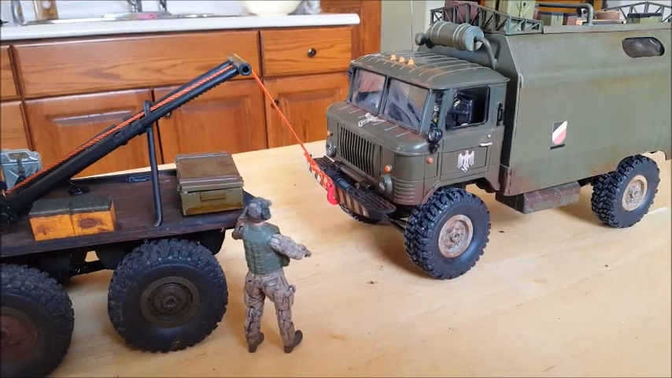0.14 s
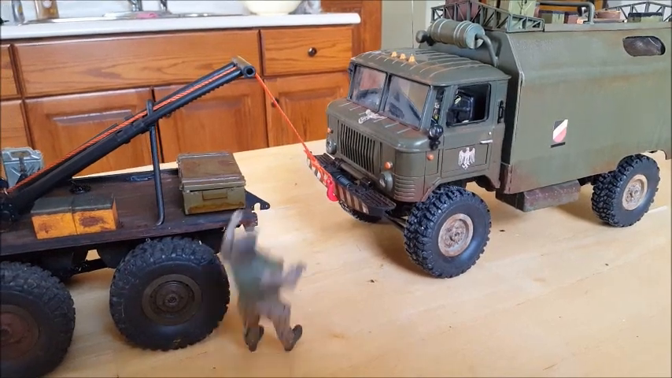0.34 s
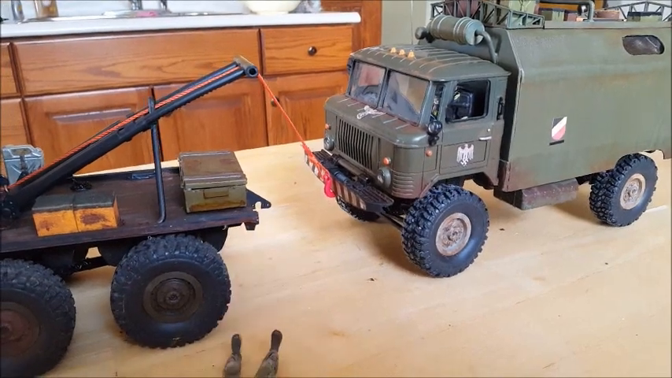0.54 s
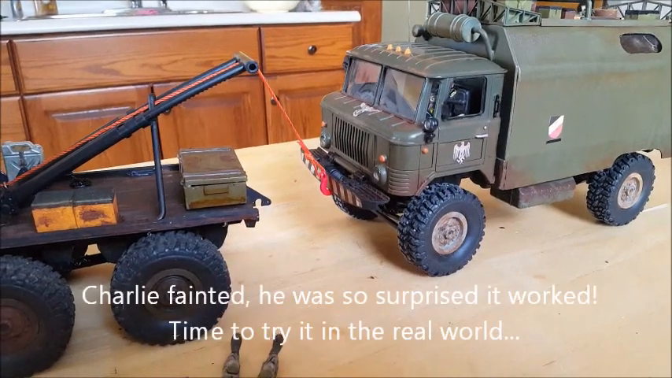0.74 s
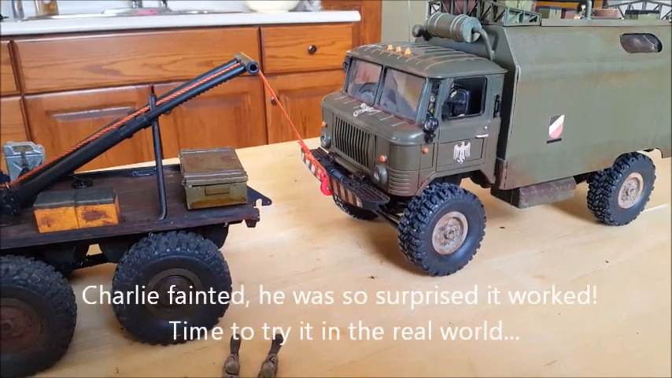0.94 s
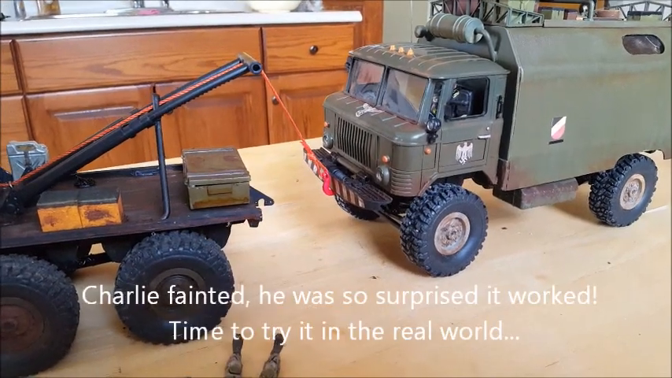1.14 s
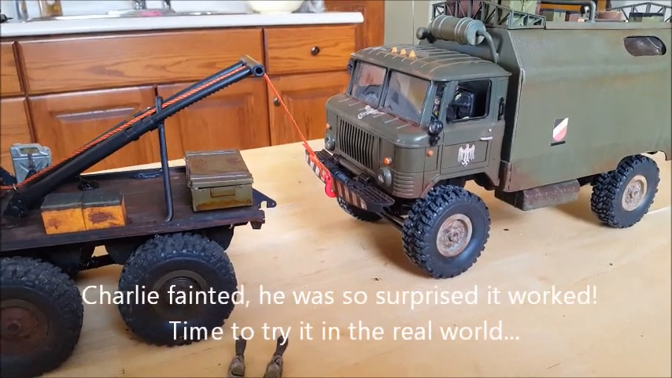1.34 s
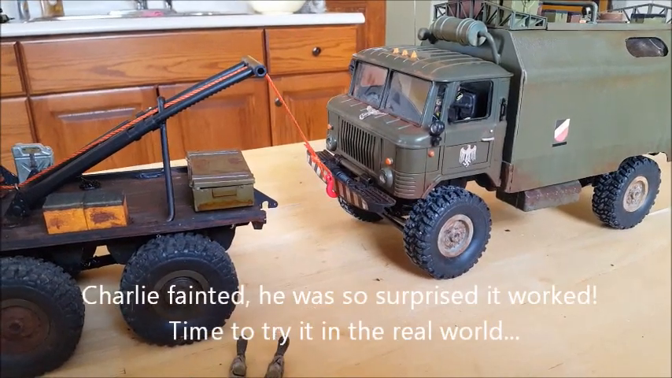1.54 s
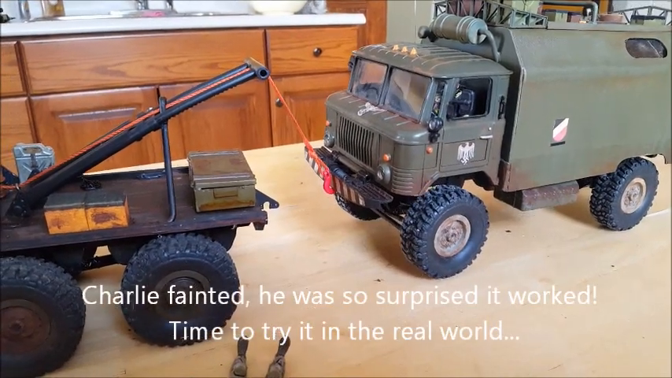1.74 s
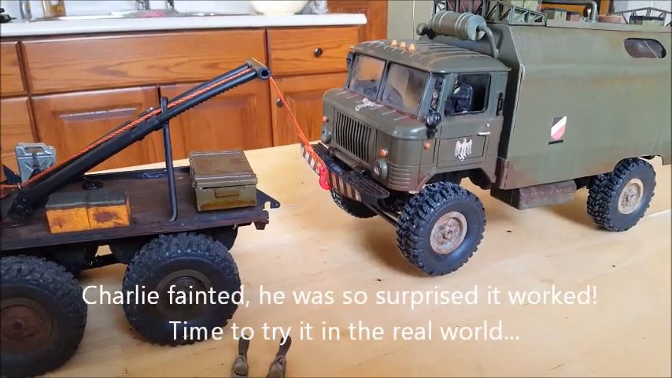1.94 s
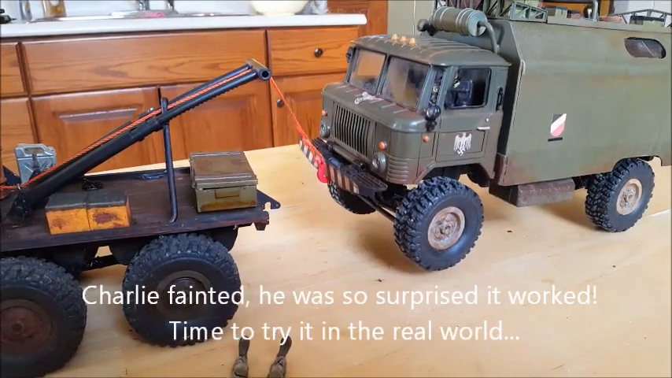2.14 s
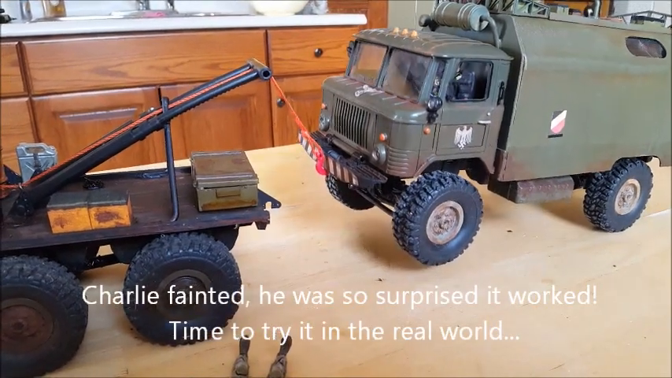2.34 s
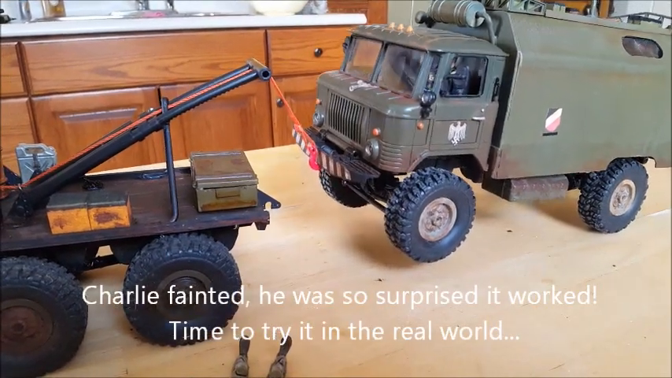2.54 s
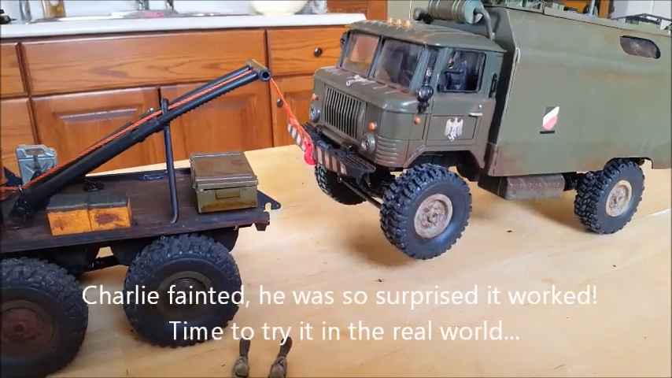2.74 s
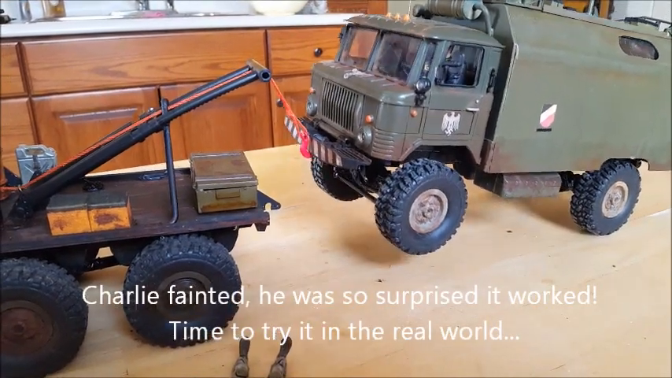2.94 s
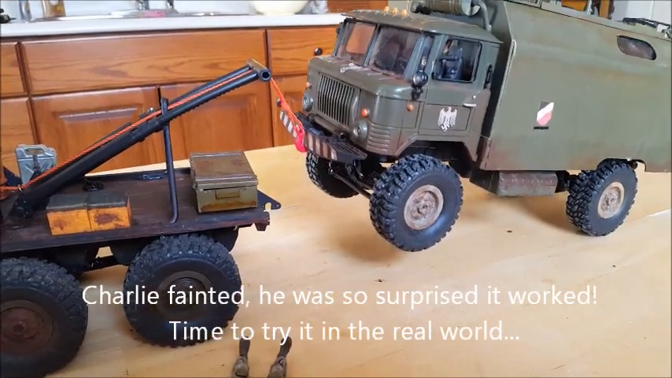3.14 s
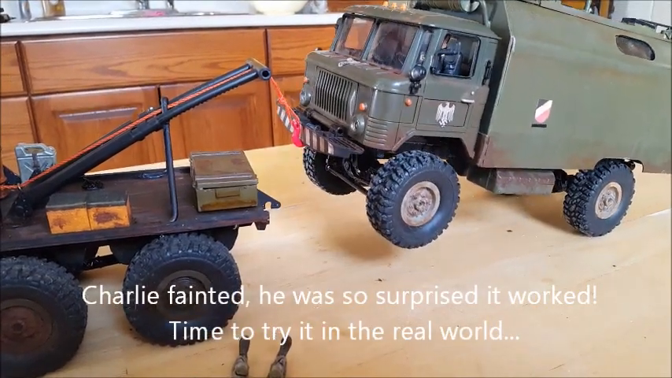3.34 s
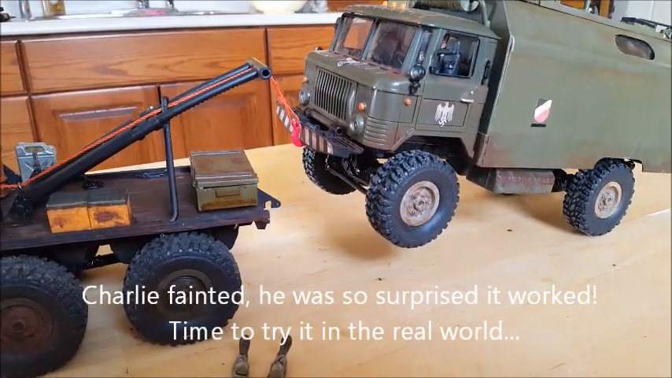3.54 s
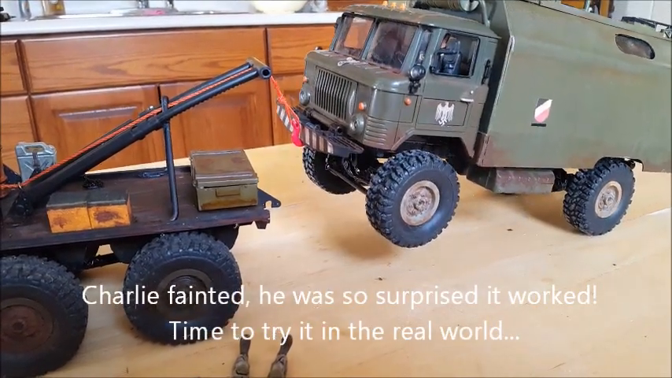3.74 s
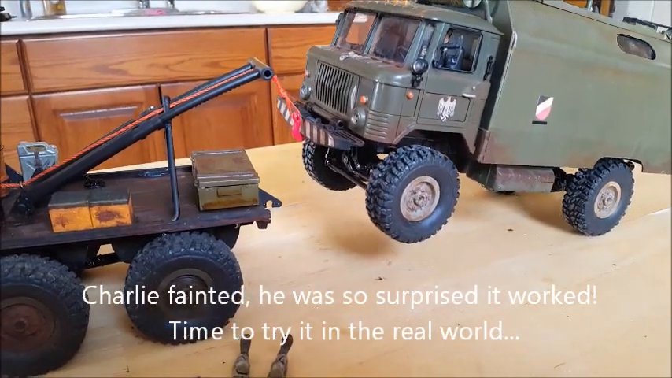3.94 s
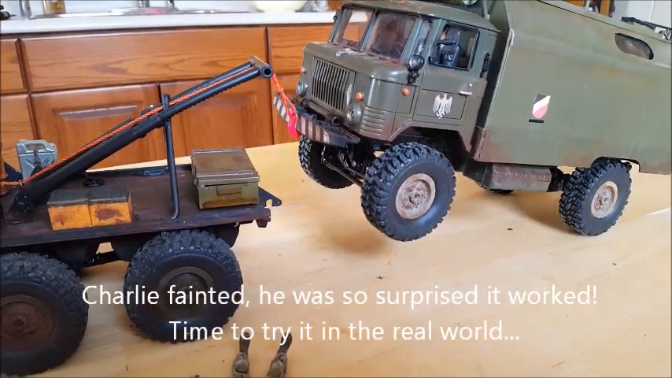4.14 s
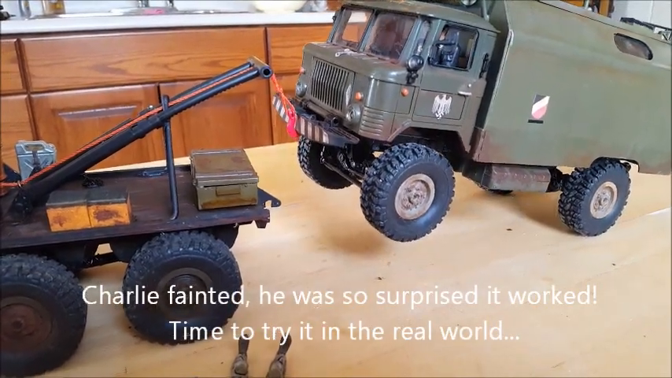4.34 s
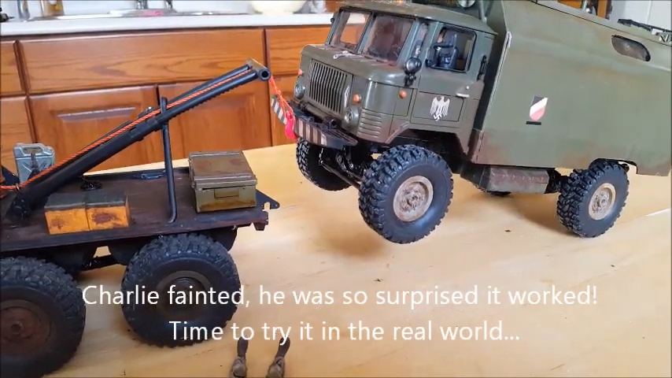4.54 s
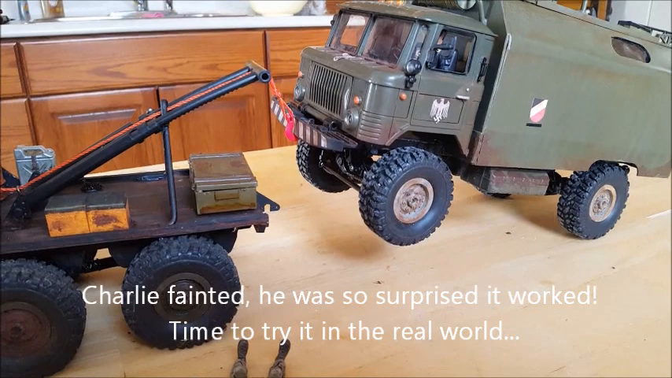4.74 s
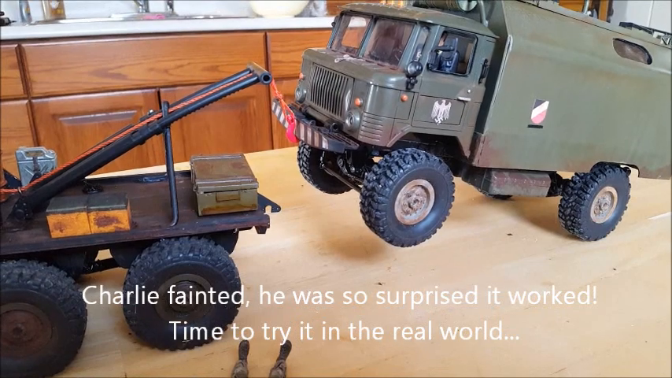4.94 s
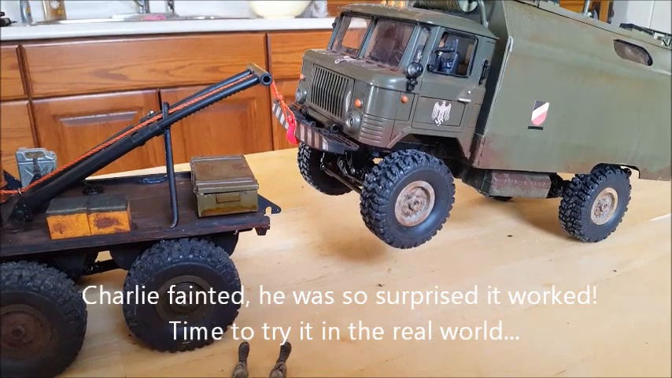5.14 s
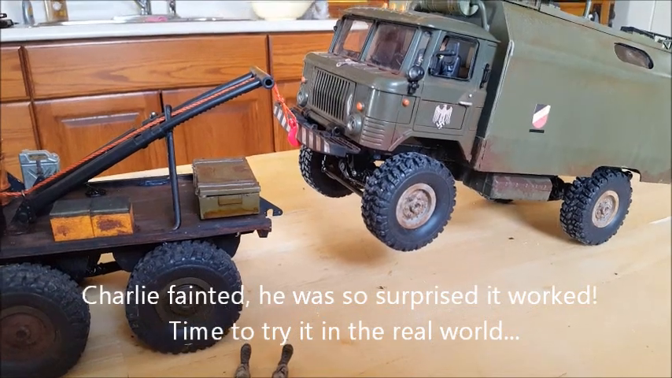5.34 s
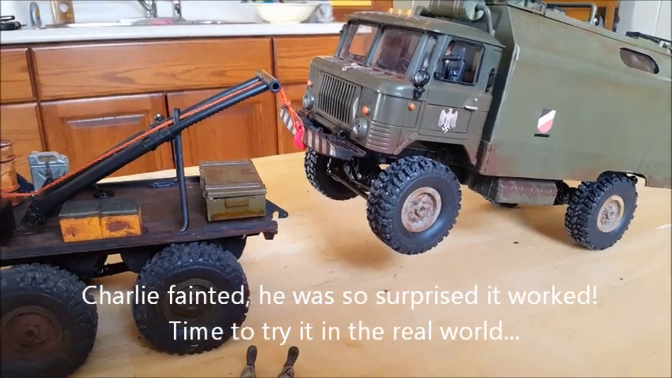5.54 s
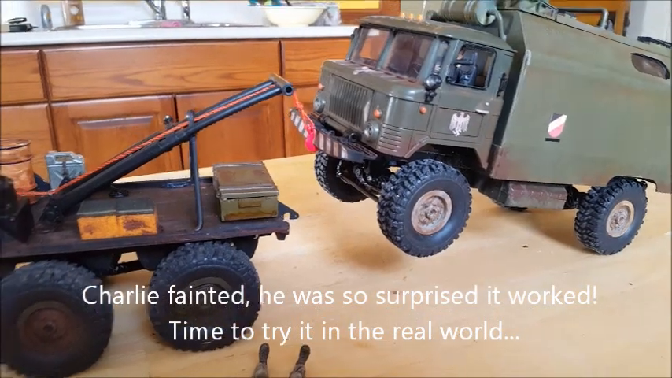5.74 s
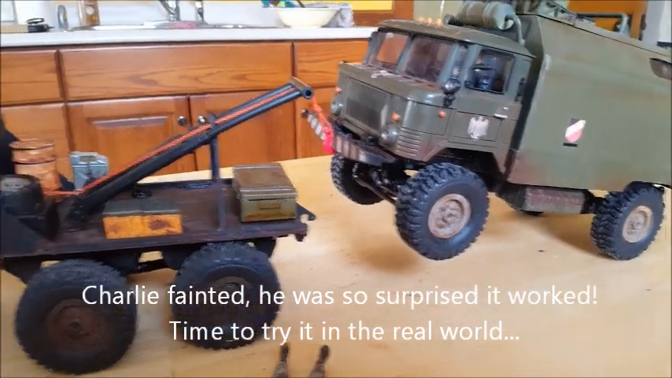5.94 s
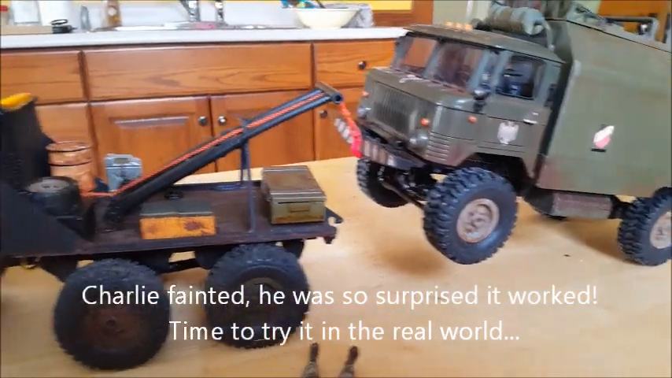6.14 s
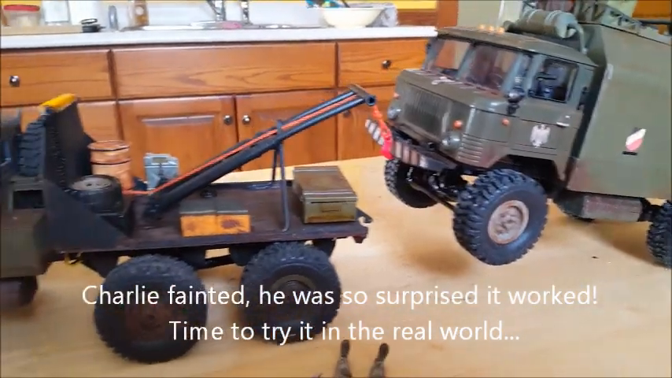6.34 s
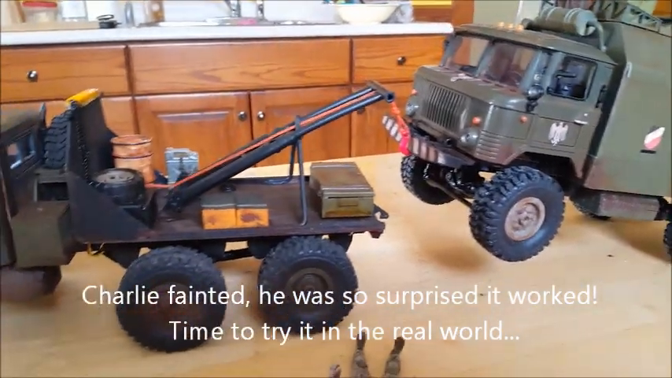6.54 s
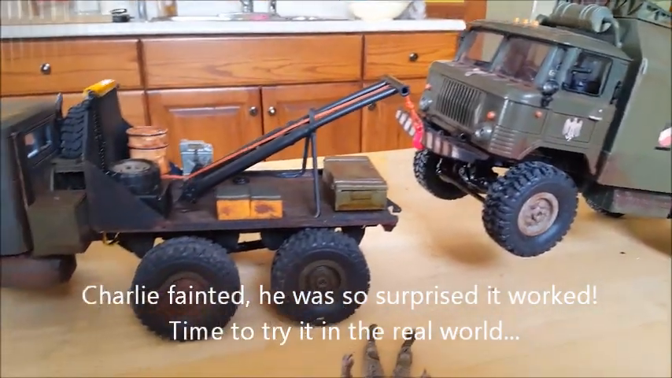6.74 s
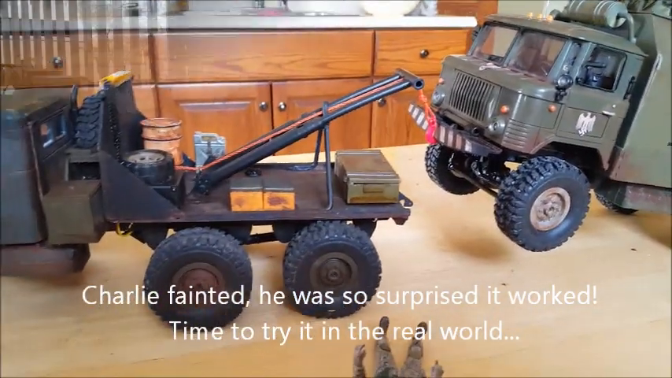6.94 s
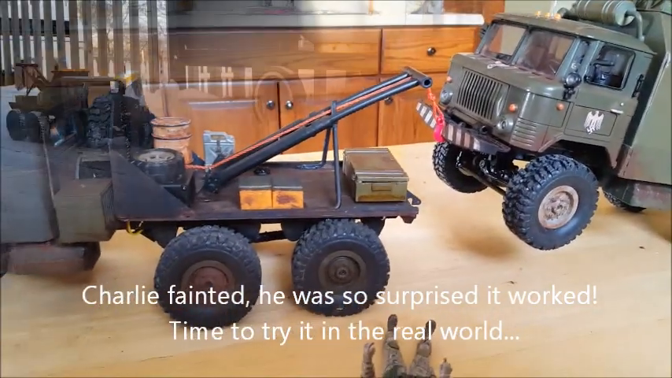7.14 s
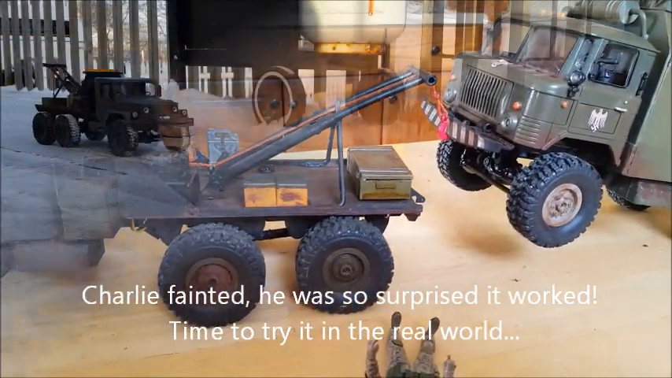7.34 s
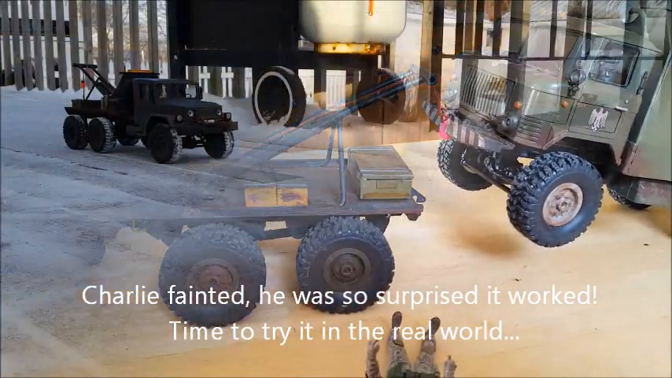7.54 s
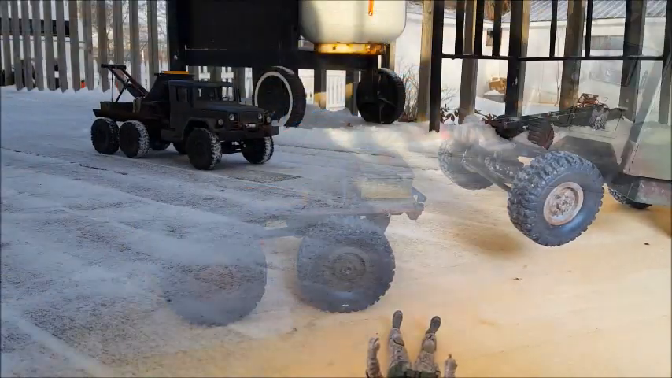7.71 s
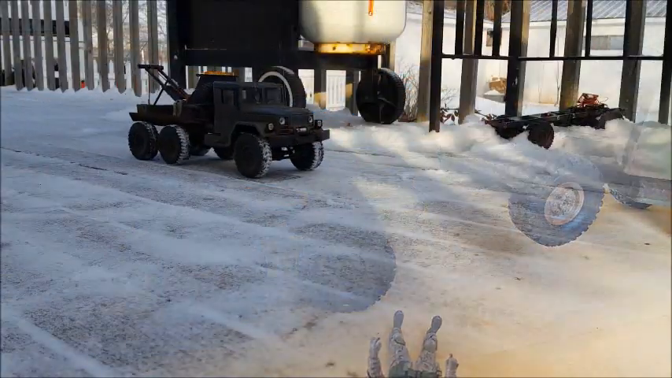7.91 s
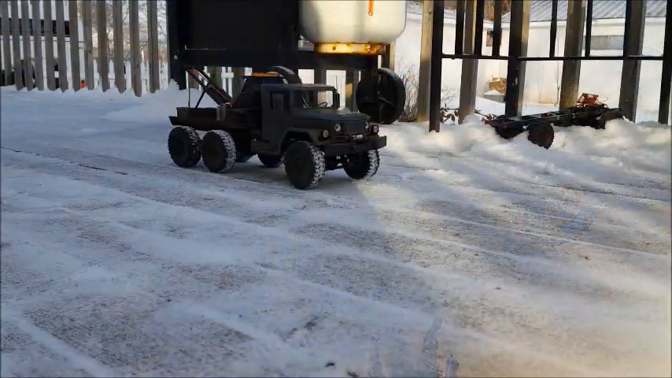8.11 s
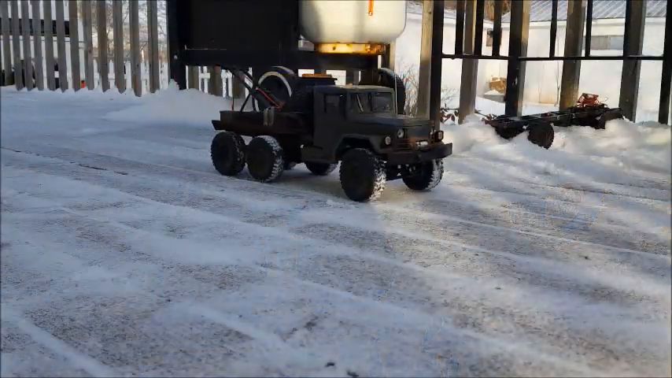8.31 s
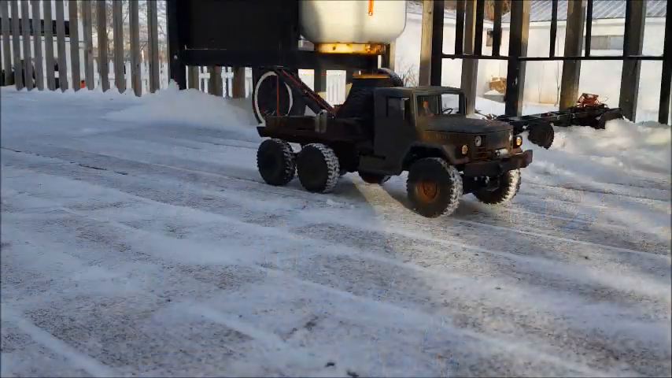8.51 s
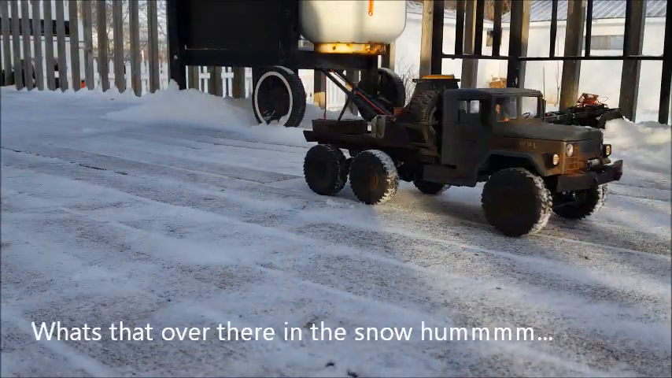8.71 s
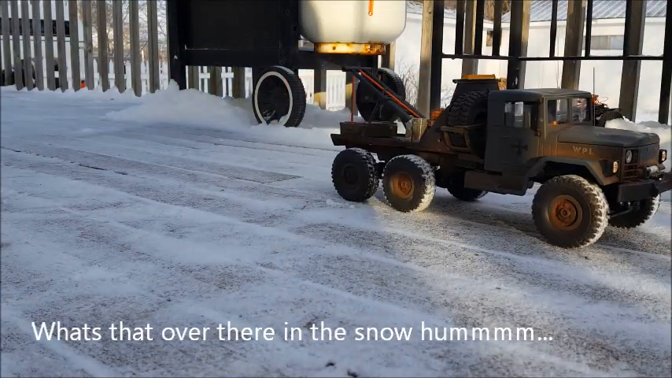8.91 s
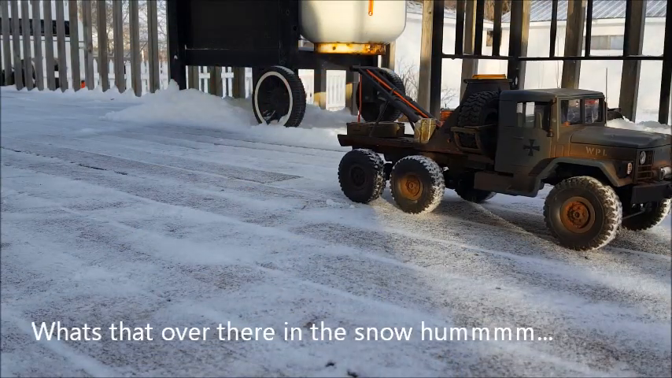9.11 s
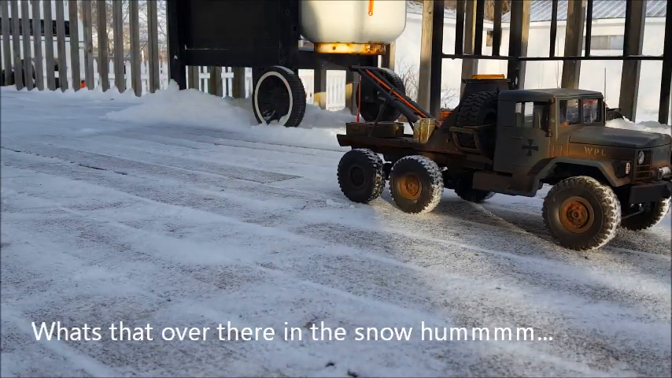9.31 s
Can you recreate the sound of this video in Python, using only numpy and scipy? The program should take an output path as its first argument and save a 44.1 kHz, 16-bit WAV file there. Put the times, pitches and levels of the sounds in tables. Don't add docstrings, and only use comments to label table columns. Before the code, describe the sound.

Shrill toy winch whine, a sharp hollow knock on wood, more winch pulls over quiet hum, then an abrupt cut to outdoor rushing, motor whirr and snow crunch.

```python
import sys
import numpy as np
from scipy import signal
from scipy.fft import rfft, irfft, next_fast_len
from scipy.io import wavfile

SR = 44100
rng = np.random.default_rng(int(sys.argv[2]) if len(sys.argv) > 2 else 0)


def volts_from_db(level):
    exponent = np.asarray(level, float) / 20
    return 10 ** exponent


def int16_out(signal):
    q = np.round(np.clip(np.atleast_2d(signal).T, -1, 1) * 32767)
    wavfile.write(sys.argv[1], SR, q.astype(np.int16))


N = 413216
T = np.arange(N) / SR
SIZE = next_fast_len(N + SR)
HZ = np.maximum(np.arange(SIZE // 2 + 1) * SR / SIZE, 1)
SCENE_CHANGE_S = 6.666
LEFT_LAG_SAMPLES = -14

# start in seconds, stop in seconds, gear hiss over the mean in dB, brush level in dB,
# line taut from in seconds.
BURSTS = [
    (0.054, 0.698, 6, 0.5, .4),
    (1.653, 3.423, 5.5, -1, 0.0054),
    (3.887, 4.183, 5, -5, 0.014),
]
# time in seconds, tooth rate in Hz.
TOOTH_RATES = [
    [(.12, 1907), (.18, 1950), (.33, 1884), (.4, 1814), (.48, 1782), (.56, 1752), (.62, 1684), (.7, 1639)],
    [(1.82, 1594), (1.89, 1631), (2.12, 1626), (2.3, 1577), (2.55, 1624), (2.68, 1593), (2.82, 1632),
     (2.94, 1543), (3.3, 1516)],
    [(3.95, 1464), (4.0, 1515), (4.045, 1535), (4.12, 1492), (4.19, 1435)],
]
# start in seconds, duration in seconds, gain in Hz.
LOAD_EASES = (3.3, 0.095, 70)
# multiple of tooth rate, level in dB, loss on a slack line in dB.
MESH = [(1, -1, -0.5), (2, -1.04, 0.5), (3, -4.5, 26), (4, 1.5, 7), (5, 0.4, 10), (6, -6, 9), (7, -13, 8)]
# centre in Hz, width in Hz, left level in dB, right level in dB, right lead in rad.
CASE = [(1600, 250, -52, -45, .05), (1810, 250, -50, -42, .05), (3200, 450, -39, -36, 1.4),
        (3720, 480, -31.5, -30.5, -.8), (4540, 260, -35.5, -41, -2), (4870, 260, -20, -25, -.4),
        (5350, 450, -27, -31, -.5), (6050, 380, -37, -39, .05), (6400, 220, -43, -58, -1.3),
        (7500, 600, -51, -53, 2.5), (8200, 330, -42, -38, 3), (8700, 500, -41, -35.5, 1.2),
        (9800, 400, -35.5, -34.5, .4), (10850, 400, -58, -47, .6)]
# multiple of shaft turn, level in dB.
SHAFT = [(3, -64), (5, -71), (6, -68), (7, -67), (9, -61.5)]
# frequency in Hz, density in dB per Hz.
LOOSE_HISS = [(500, -18.5), (1400, -25.5), (2400, -22.5), (3150, -4.5), (3600, -6.5), (4200, -6.5),
              (6200, -10), (7300, -9), (8200, -2), (9300, -13), (10700, -15), (12900, -9.5), (14500, -14.5),
              (16000, -20)]
LOADED_HISS = [(500, -18), (2500, -17), (3100, -4), (3600, -24), (3850, -8), (4100, -44), (4350, -28),
               (4800, 1), (5700, -10), (6300, -5), (7250, -24), (8100, -6), (8900, -15), (9700, -8),
               (10500, -22), (12700, -1), (14500, -15), (15800, -14)]
# frequency in Hz, left-right difference in dB.
HISS_PAN = [(500, -1.5), (3000, -3.5), (5000, 3.5), (6500, 9), (8000, 1), (11000, -6.5), (13000, 9.5),
            (15500, 21.5)]
# frequency in Hz, likeness of the sides 0-1.
HISS_ALIKE = [(500, 0.43), (3000, 0.31), (8000, 0.2), (15000, 0.33)]
# frequency in Hz, density in dB per Hz.
IDLE_BUZZ = [(10500, -41.0), (11800, -0.5), (12800, -2), (14200, -5.0), (15000, -41)]
# time in seconds, peak in dB, ring in Hz, left-right difference in dB.
CLICKS = [
    (.0356, -17, 2110, 4.5),
    (1.6025, -22.5, 2050, 8),
    (4.1657, -20.5, 2680, 6),
    (5.1682, -57.5, 2200, 2),
    (6.4694, -47.5, 2400, -.6),
    (8.653, -28, 1520, -8),
    (8.79, -40, 2600, 0),
    (8.8745, -30, 1710, -16),
    (9.11, -37, 2600, -6),
]
# time in seconds, peak in dB, ring in Hz, left-right difference in dB.
TAPS = [(0.8294, -48, 1840, -18), (0.9063, -38, 1850, -5.5), (1.0193, -51.5, 1864, -5.5),
        (3.8207, -60, 1370, -1), (4.0184, -44, 2080, -4.5), (4.346, -60, 2530, -4),
        (4.407, -44.5, 1070, -0.5), (4.7863, -58, 982, -2.5)]
# time in seconds, peak in dB, crack in dB.
FALL = [
    (0.585, -1, -24),
    (0.612, -6.5, -24),
    (0.64, -6.5, -17.5),
    (0.669, -22.5, -16),
    (0.699, -24.5, -22),
]
# frequency in Hz, level in dB, t60 in seconds.
BOARDS = [(152.8, -17.5, 0.52), (217, -16.5, 0.78), (266, -15.5, 0.32), (450, -5.5, 0.5),
          (515, -14.5, 0.25), (624, -17, 0.48), (740, -9, 0.18), (870, -2.5, 0.64), (1076, -5, 0.25),
          (1150, -9, 0.42), (1264, -6, 0.51), (1290, -18.5, 0.388), (1567, -25, 0.49), (1590, -17, 0.3),
          (1786, -11.5, 0.52), (1720, -20.5, 0.48)]
# frequency in Hz, density in dB per Hz.
THUMP = [(29, -42), (50, -14.5), (203, -3), (304, -18), (446, -10), (539, -12.5), (1020, -4.5), (4140, -23),
         (5010, -19), (7350, -55.5), (8000, -37), (10400, -63.5), (17600, -120)]
# time in seconds, level in dB.
THROTTLE = [(6.68, -46.5), (7.4, -48), (7.55, -45), (8.04, -44), (8.62, -40), (8.73, -42), (8.86, -42.5),
            (9.02, -52), (9.12, -50.5)]
# time in seconds, turn rate in Hz.
TRUCK_TURNS = [(6.67, 381), (7.1, 381), (7.4, 378), (8.65, 380), (8.85, 349), (9.15, 330)]
# multiple of turn rate, level in dB.
TRUCK_ORDERS = [(2, -12), (4, -3), (5, -7), (7, -13), (14.3, -14)]
# frequency in Hz, width in Hz, level in dB.
TRUCK_RINGS = [(448, 74, -4), (734, 20, -11), (1207, 140, 0), (2600, 130, -2.5), (5360, 200, -40)]
# frequency in Hz, density in dB per Hz.
WHIRR = [(530, -13), (900, -14.5), (1390, -4), (1510, -2), (1640, -4), (1890, -2), (2590, -6.5),
         (3400, -14.5), (4420, -43), (7480, -120)]
CRUNCH = [(1760, -54), (3000, -10.5), (4230, 1.5), (4900, -1.5), (5440, 2.5), (7050, -5), (8700, -5.5),
          (10500, -13.5), (15000, -11.5), (16000, -31)]
# frequency in Hz, left-right difference in dB.
CRUNCH_PAN = [(4000, 0.5), (8000, -3.5), (13000, 9.5)]
# frequency in Hz, likeness of the sides 0-1.
YARD_ALIKE = [(60, 0.24), (180, 0.7), (550, 0.52), (1650, 0.041), (4970, 0.025), (15000, 0.02)]
# frequency in Hz, t60 in seconds.
ROOM_T60 = [(60, .6), (300, .52), (2000, .46), (5000, .33), (12000, .2)]
# frequency in Hz, side share 0-1.
ROOM_WIDTH = [(100, .25), (300, .4), (900, 0.92)]
# frequency in Hz, density in dB per Hz.
KITCHEN = [(12, -37), (20, -16), (43, -22), (81, -5.5), (138, -6.5), (187, -6.5), (319, -13.5),
           (377, -11.5), (527, -17), (1370, -21.5), (1480, -23), (2670, -26.5), (4810, -37.5), (13000, -46),
           (16000, -42)]
# frequency in Hz, likeness of the sides.
KITCHEN_ALIKE = [(60, 1), (180, 0.88), (550, 0.94), (1650, 0.037), (4970, -0.14), (15000, -0.06)]
# time # in seconds, level in dB.
KITCHEN_LEVEL = [(0.0, -53.5), (0.57, -51.5), (0.72, -41), (0.94, -56), (1.21, -56), (1.8, -54),
                 (3.25, -50.5), (3.71, -53.5), (4.04, -53), (6.6, -55.5)]
KITCHEN_FADE = [(6.7, 6), (7.6, 7), (8.6, 4), (9.37, -40)]
# multiple of stroke rate, level in dB.
HUM = [(1, -61), (2, -60.5), (3, -74), (4, -71)]
# frequency in Hz, level in dB.
HUM_LINES = [(145.3, -78), (242.2, -72), (1362, -72.5), (2724, -82)]
# frequency in Hz, density in dB per Hz.
TRAFFIC = [(12, -44), (20, -24), (70, -2), (107, -3.5), (146, -5), (198, -12), (270, -13), (542, -7),
           (738, -5), (1060, -11), (16000, -53.5)]
# frequency in Hz, width in Hz, level in dB.
FAR_FAN = (742, 25, -13)

TEETH = 10
SPIN_UP_S, SPIN_START_SHARE, WHINE_RISE_S = 0.032, 0.64, 0.064
ATTACK_S, RELEASE_S, TAUTEN_S, GEAR_DB = 0.023, 0.04, 0.04, -45.5
LABOUR_HZ, LABOUR_DB_PER_HZ, KNOCK_FREE_DB, KNOCK_RANGE_DB = 1569, 0.6, -13, 14.5
IDLE_DB, IDLE_OFF_S, IDLE_REST_DB = -78.5, 4.85, -86.5
CONTACT_HZ = 2467
HALT_S, HALT_FADE_S, HALT_DB, HALT_CRUNCH_DB = 9.13, 0.098, -8.5, -4
CRUNCH_DB, CRUNCH_FOLLOWS, WHINE_EXTRA = -47.5, 0.61, 0.66
CRUST_S, CRUST_DB_PER_S2 = 7.84, -2.5
HUM_HZ, TRAFFIC_DB = 93.3, -46
TOP_HZ, OFFSET = 15700, -0.0007


def rms_one(x):
    return x / np.sqrt(np.mean(x ** 2) + 1e-20)


def in_time(rows):
    s, *columns = np.transpose(rows)
    return [np.interp(T, s, c) for c in columns]


def at_hz(points, hz):
    table_hz, value = np.transpose(points)
    return np.interp(np.log(hz), np.log(table_hz), value)


def drift(rate_hz):
    r = np.exp(-40 * np.pi * rate_hz / SR)
    slow = signal.lfilter([1], [1, -2 * r, r * r], rng.standard_normal(N // 20 + 4002))[4000:]
    return np.interp(np.arange(N) / 20, np.arange(len(slow)), rms_one(slow))


def bandpass(x, low_hz, high_hz, order=1):
    return signal.sosfilt(signal.butter(order, [low_hz, high_hz], "band", fs=SR, output="sos"), x)


def pair(x, pan_db, lag=LEFT_LAG_SAMPLES):
    return np.array([np.roll(x, round(lag)) * volts_from_db(pan_db / 2), x * volts_from_db(-pan_db / 2)])


def ring(x, hz, t60_s):
    r, w = volts_from_db(-60 / (t60_s * SR)), 2 * np.pi * hz / SR
    return signal.lfilter([0, np.sin(w)], [1, -2 * r * np.cos(w), r * r], x + 1e-18)


def noise(spectrum, alike, patchy_db=0, lag=0, pan=((1, 0), (2, 0)), grain_db=0):
    grain = volts_from_db(grain_db * np.minimum(rng.exponential(1, SIZE), 4))
    both, left, right = rfft(rng.standard_normal((3, SIZE)) * grain) * volts_from_db(at_hz(spectrum, HZ))
    c, side = np.clip(at_hz(alike, HZ), 0, 1), volts_from_db(at_hz(pan, HZ) / 2)
    late = np.exp(-2j * np.pi * HZ * lag / SR)
    left = (np.sqrt(c) * both * late + np.sqrt(1 - c) * left) * side
    right = (np.sqrt(c) * both + np.sqrt(1 - c) * right) / side
    lr = np.array([left, right])
    if not patchy_db:
        out = irfft(lr, SIZE)[:, :N]
    else:
        out = np.zeros((2, N))
        octave, shared = np.clip(np.log2(HZ / 200), 0, 6), drift(4.8)
        for k in range(7):
            band = irfft(lr * np.clip(1 - abs(octave - k), 0, 1), SIZE)[:, :N]
            out += band * volts_from_db(patchy_db * (0.13 * shared + drift(19.3)))
    return out / np.std(out.mean(axis=0))


def winch(burst, tooth_rate, hiss):
    start_s, stop_s, hiss_db, brush_db, taut_s = burst
    since_s = np.maximum(T - start_s, 0)
    ease_s, ease_over_s, ease_hz = LOAD_EASES
    eased_hz = ease_hz * np.clip((T - ease_s) / ease_over_s, 0, 1) * (start_s < ease_s)
    spin_up = 1 - (1 - SPIN_START_SHARE) * np.exp(-(since_s / SPIN_UP_S) ** 2)
    teeth_hz = (in_time(tooth_rate)[0] + eased_hz) * spin_up
    waver = 1 + 0.003 * drift(30.2) + 0.0032 * drift(120)
    phase = 2 * np.pi * np.cumsum(teeth_hz * waver) / SR
    turn = phase / TEETH

    out = hiss * volts_from_db(GEAR_DB + hiss_db) * (1 + 0.16 * np.cos(turn))
    bite = np.minimum(since_s / WHINE_RISE_S, 1)
    slack = np.clip((taut_s - T) / TAUTEN_S, 0, 1)
    for k, mesh_db, slack_db in MESH:
        throb = 1 + 0.36 * np.cos(turn + k) + 0.17 * np.cos(2 * turn + k)
        uneven = 1 + 0.17 * drift(100.0)
        left, right, lead = case_gain(k * teeth_hz[::16])
        gain = bite * volts_from_db(mesh_db - slack_db * slack + 2.4 * drift(34.0)) * throb * uneven
        left_whine = np.roll(gain * left * np.sin(k * phase), LEFT_LAG_SAMPLES)
        out = out + [left_whine, gain * right * np.sin(k * phase + lead)]
    out = out + pair(brushes(turn) * volts_from_db(GEAR_DB + brush_db + 1), 9, lag=-15)

    knock = sum(volts_from_db(db + 2.0 * drift(12)) * np.sin(k * turn + k) for k, db in SHAFT)
    labour_db = np.clip((LABOUR_HZ - teeth_hz) * LABOUR_DB_PER_HZ, 0, KNOCK_RANGE_DB)
    out = out + pair(knock * volts_from_db(KNOCK_FREE_DB + labour_db), -5.5, lag=-1.5)
    on = np.interp(T, [start_s, start_s + ATTACK_S, stop_s, stop_s + RELEASE_S], [0, 1, 1, 0]) ** 2
    return on * out


def case_gain(hz):
    power, cross = np.zeros((2, len(hz))), np.zeros(len(hz), complex)
    for top_hz, width_hz, left_db, right_db, lead in CASE:
        shape = (1 + (2 * (hz - top_hz) / width_hz) ** 2) ** -2
        power += volts_from_db([[left_db], [right_db]]) ** 2 * shape
        cross += volts_from_db(left_db + right_db) * shape * np.exp(1j * lead)
    left, right = np.sqrt(power)
    return np.repeat([left, right, np.angle(cross)], 16, axis=1)[:, :N]


def brushes(turn):
    angle = np.linspace(0, 2 * np.pi, 300)
    track = np.interp(turn % (2 * np.pi), angle, rng.standard_normal(300))
    return rms_one(bandpass(track, 11800, 13900, order=2))


def servo_idle():
    buzz = noise(IDLE_BUZZ, HISS_ALIKE, pan=HISS_PAN)
    return buzz * volts_from_db(np.where(T < IDLE_OFF_S, IDLE_DB, IDLE_REST_DB)) * (T < SCENE_CHANGE_S)


def clicks(rows, t60_s, lift_db, top_hz, ring_share):
    out, fade_s = np.zeros((2, N)), np.arange(1500) / SR
    decay = (np.exp(-fade_s / 0.0021) + 0.6 * np.exp(-fade_s / 0.012)) * np.minimum(fade_s / 0.00035, 1)
    for s, peak_db, hz, pan_db in rows:
        burst = rng.standard_normal(1500) * decay
        snap = rms_one(bandpass(burst, 600, top_hz))
        body = rms_one(ring(burst, hz, t60_s)) + 0.14 * rms_one(ring(burst, hz / 2, t60_s))
        tick = ring_share * body + (1 - ring_share) * snap
        placed, i = np.zeros(N), round(s * SR)
        placed[i:i + 1500] = tick / abs(tick).max() * volts_from_db(peak_db + lift_db)
        out += pair(placed, pan_db)
    return out


def fall():
    out, fade_s = np.zeros(N), np.arange(SR // 2) / SR
    size = len(fade_s)
    colour = volts_from_db(at_hz(THUMP, np.maximum(np.arange(size // 2 + 1) * 2, 1)))
    tap = signal.lfilter(*signal.butter(1, CONTACT_HZ, fs=SR), 1.0 * (fade_s == 0))
    decay = np.exp(-fade_s / 0.014)
    for s, peak_db, crack_db in FALL:
        chance = rng.standard_normal(size)
        modes = np.zeros(size)
        for (hz, level_db, t60_s), luck in zip(BOARDS, chance):
            modes += ring(tap, hz, 0.2 * min(t60_s, 0.6)) * volts_from_db(level_db - 11.0 + 0.83 * luck)
        shell = ring(tap, 1120, 0.03) * volts_from_db(-8.0)
        thud = rms_one(irfft(rfft(chance) * colour)) * decay * np.minimum(fade_s / 0.002, 1)
        crack = bandpass(chance, 1800, 5000) * decay
        i = round(s * SR)
        out[i:i + size] += volts_from_db(peak_db) * (modes + shell + volts_from_db(-7.0) * thud + volts_from_db(crack_db) * crack)
    return signal.sosfilt(signal.butter(4, 90, "high", fs=SR, output="sos"), out)


def truck():
    throttle_db, = in_time(THROTTLE)
    swing_db = throttle_db + 44
    halted = np.clip((T - HALT_S) / HALT_FADE_S, 0, 1)
    drive, rings = rng.standard_normal(N), np.zeros(N)
    for hz, width_hz, db in TRUCK_RINGS:
        rings += rms_one(ring(drive, hz, 2.9 / width_hz)) * volts_from_db(db + 3.0 * drift(3.6))
    turn = 2 * np.pi * np.cumsum(in_time(TRUCK_TURNS)[0] * (1 + 0.005 * drift(6))) / SR
    whine = sum(volts_from_db(db + 3 * drift(4) + 2.5 * drift(30)) * np.sin(k * turn) for k, db in TRUCK_ORDERS)
    tonal = volts_from_db(-1.5) * rms_one(rings) + whine * volts_from_db(WHINE_EXTRA * swing_db)
    whirr = noise(WHIRR, YARD_ALIKE, patchy_db=3.0, lag=-3.0, grain_db=4.0) + pair(tonal, 0, lag=-4.5)
    crunch = noise(CRUNCH, YARD_ALIKE, patchy_db=2.0, pan=CRUNCH_PAN, grain_db=4.0)
    crust_db = CRUST_DB_PER_S2 * (T - CRUST_S) ** 2
    crunch_db = CRUNCH_DB + CRUNCH_FOLLOWS * swing_db + crust_db + (HALT_DB + HALT_CRUNCH_DB) * halted
    return whirr * volts_from_db(throttle_db + HALT_DB * halted - 2.5) + crunch * volts_from_db(crunch_db)


def room(x):
    out, t60_s = np.zeros((2, len(HZ)), complex), at_hz(ROOM_T60, HZ)
    for k, lag_s in enumerate(rng.uniform(0.017, 0.061, 28)):
        loop = volts_from_db(-60 * lag_s / t60_s) * np.exp(-2j * np.pi * HZ * lag_s)
        out[k % 2] += loop / (1 - loop) * (-1) ** (k // 2)
    mid = out.mean(axis=0)
    response = mid + (out - mid) * at_hz(ROOM_WIDTH, HZ)
    return irfft(response * rfft(x, SIZE), SIZE)[:, :N] / 3


def kitchen():
    stroke = 2 * np.pi * HUM_HZ * T + 0.61 * drift(2.2)
    hum = np.zeros(N)
    for k, db in HUM:
        hum += volts_from_db(db + 2.5 + 1.1 * drift(15)) * np.cos(k * stroke + 0.12 * drift(12))
    for hz, db in HUM_LINES:
        hum += volts_from_db(db + 3 + 2.5 * drift(5)) * np.sin(2 * np.pi * hz * T + 0.7 * drift(3))
    tone = noise(KITCHEN, KITCHEN_ALIKE, lag=11) * volts_from_db(-60.5)
    level_db = in_time(KITCHEN_LEVEL)[0] + 52.0 + in_time(KITCHEN_FADE)[0]
    return (tone + pair(hum, 0.99, lag=11.8)) * volts_from_db(level_db)


def traffic():
    fan_hz, width_hz, fan_db = FAR_FAN
    fan = rms_one(ring(rng.standard_normal(N), fan_hz, 2.2 / width_hz)) * volts_from_db(fan_db)
    return (noise(TRAFFIC, YARD_ALIKE, patchy_db=1.7) + fan) * volts_from_db(TRAFFIC_DB)


def scene():
    loaded = noise(LOADED_HISS, HISS_ALIKE, lag=LEFT_LAG_SAMPLES, pan=HISS_PAN, grain_db=3.5)
    loose = noise(LOOSE_HISS, HISS_ALIKE, lag=LEFT_LAG_SAMPLES, pan=HISS_PAN, grain_db=1.5)
    motor = sum(winch(*run) for run in zip(BURSTS, TOOTH_RATES, (loose, loaded, loaded)))
    ticks = clicks(CLICKS, t60_s=0.0091, lift_db=-1.5, top_hz=5110, ring_share=0.35)
    taps = clicks(TAPS, t60_s=0.045, lift_db=4, top_hz=5000, ring_share=0.94)
    drop = fall()
    indoor_clicks = (ticks[1] * volts_from_db(-2.0) + taps[1] * volts_from_db(-25.0)) * (T < SCENE_CHANGE_S)
    wet = room(motor[1] * volts_from_db(-7.0) + indoor_clicks + drop * volts_from_db(-7.5))
    near = motor * volts_from_db(-2.5) + ticks + taps + pair(drop * volts_from_db(-0.4), -3, lag=-6)
    yard = (truck() + traffic()) * np.clip((T - SCENE_CHANGE_S) / 0.0042, 0, 1)
    return near + wet + servo_idle() + kitchen() + yard


def roll_off(x):
    return signal.sosfilt(signal.butter(12, 16860, fs=SR, output="sos"), x)


def record(dry):
    rounded = 0.93 * np.tanh(dry / 0.93)
    cut = signal.sosfilt(signal.ellip(10, 0.5, 60, TOP_HZ, fs=SR, output="sos"), rounded)
    return roll_off(cut + OFFSET)


dry = scene()
out = record(dry)
int16_out(out)
```